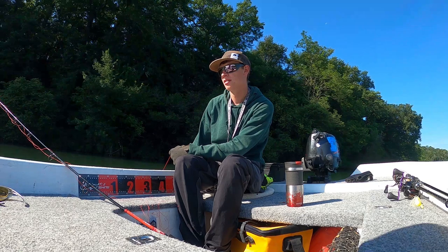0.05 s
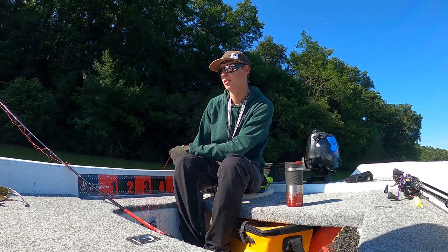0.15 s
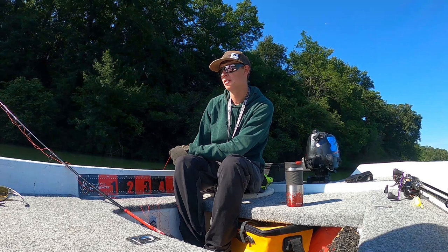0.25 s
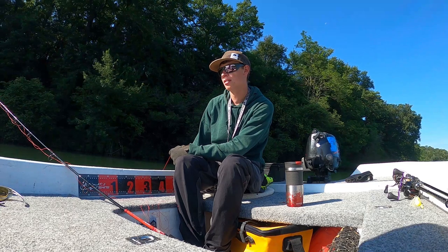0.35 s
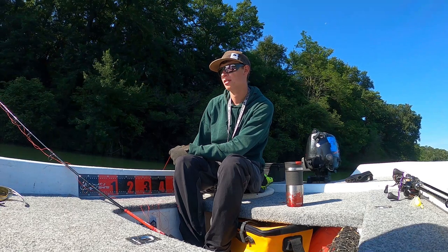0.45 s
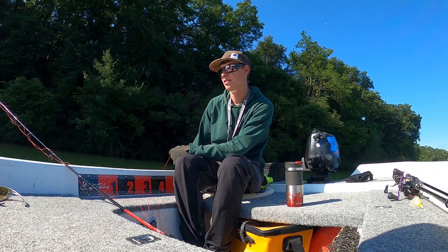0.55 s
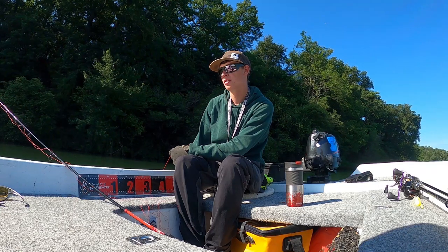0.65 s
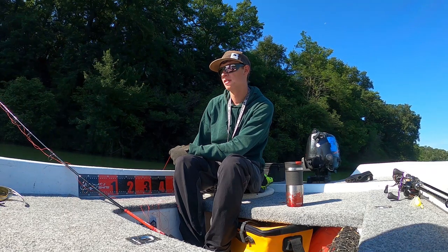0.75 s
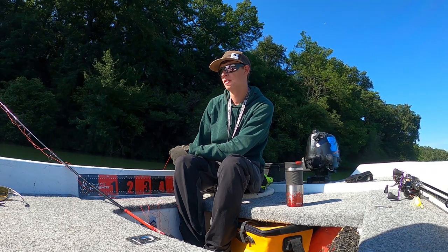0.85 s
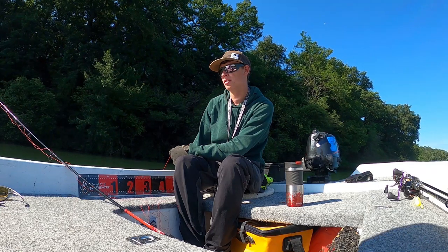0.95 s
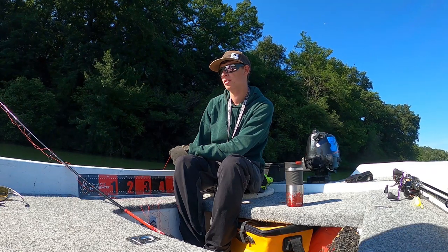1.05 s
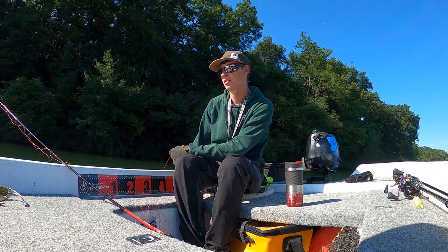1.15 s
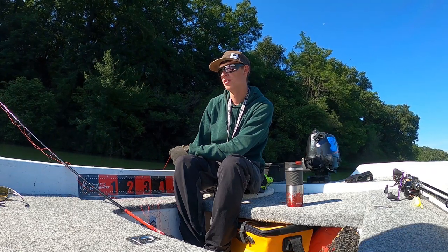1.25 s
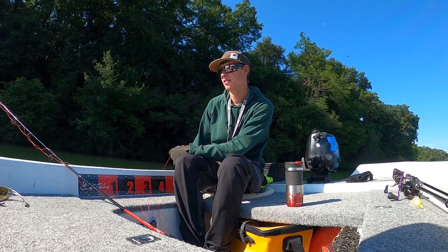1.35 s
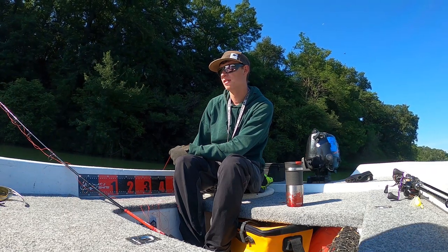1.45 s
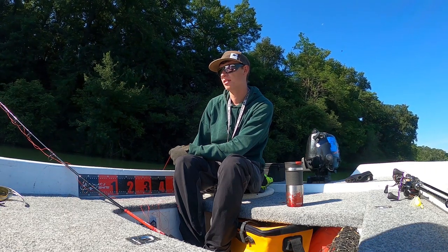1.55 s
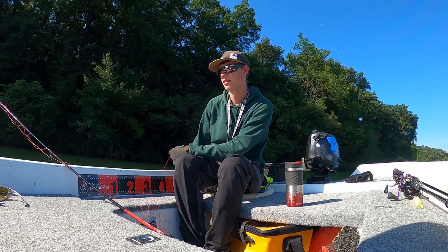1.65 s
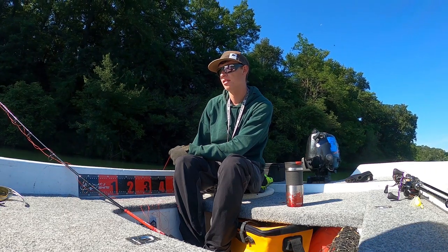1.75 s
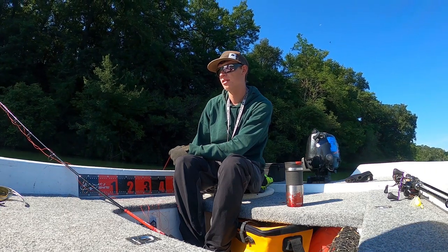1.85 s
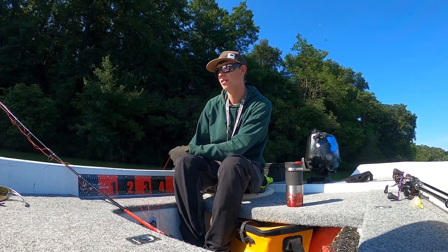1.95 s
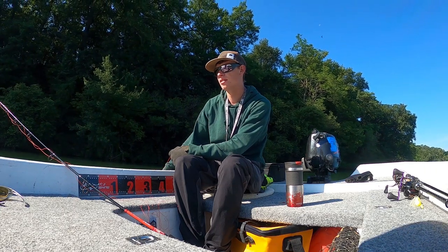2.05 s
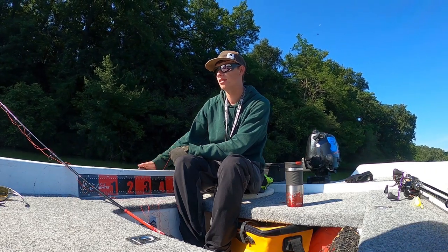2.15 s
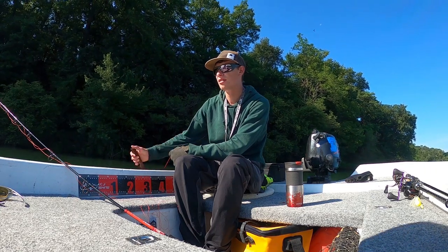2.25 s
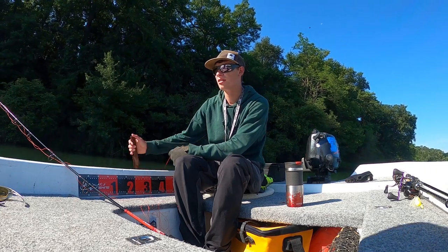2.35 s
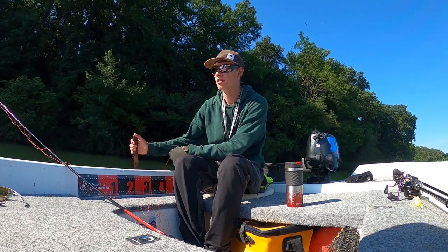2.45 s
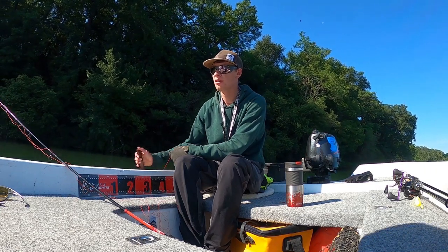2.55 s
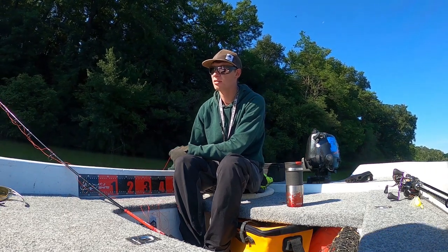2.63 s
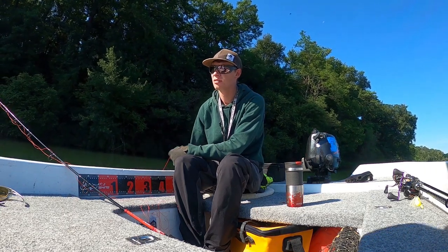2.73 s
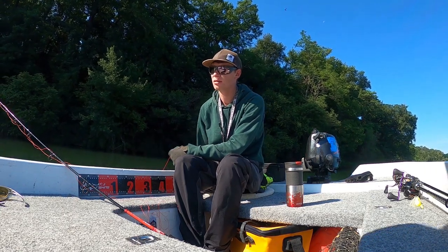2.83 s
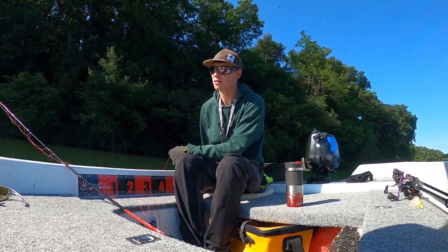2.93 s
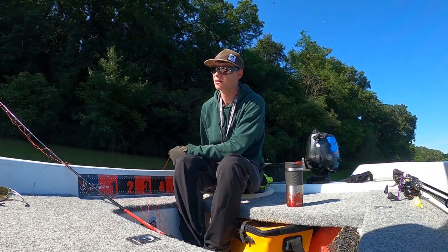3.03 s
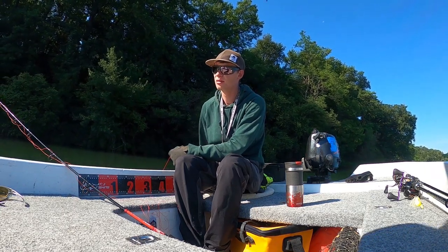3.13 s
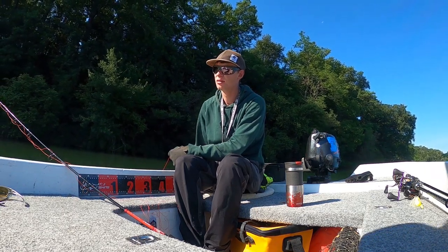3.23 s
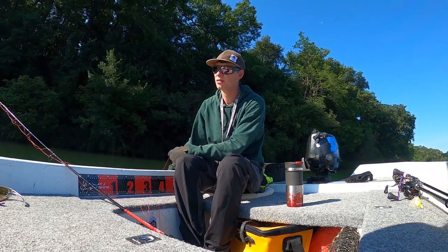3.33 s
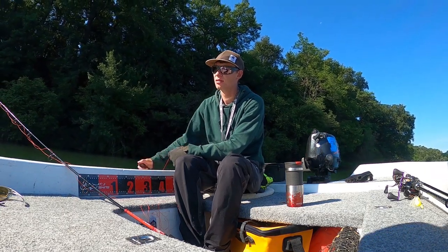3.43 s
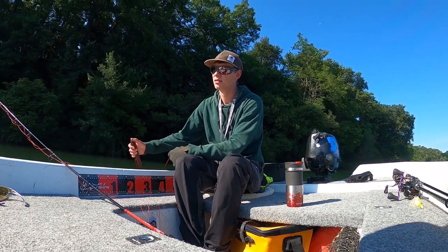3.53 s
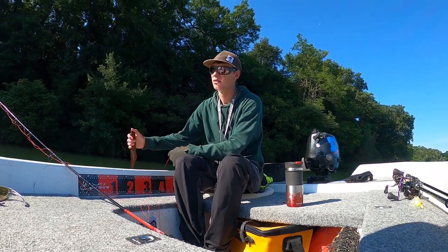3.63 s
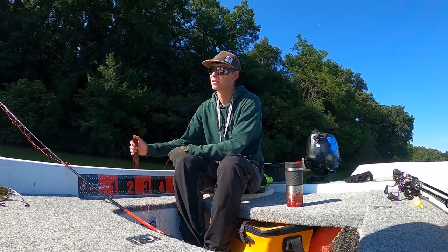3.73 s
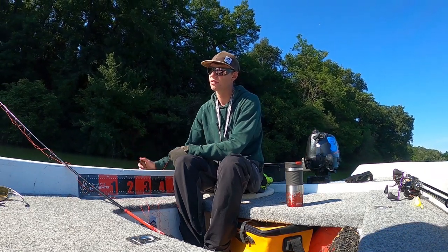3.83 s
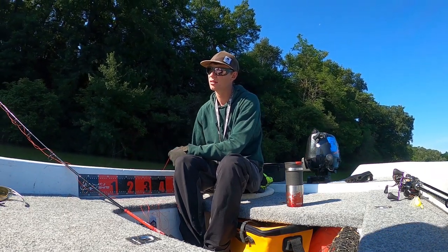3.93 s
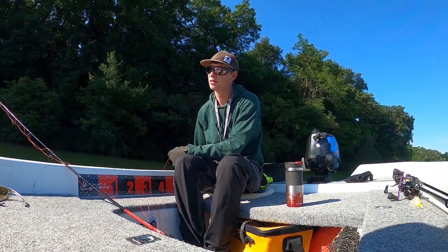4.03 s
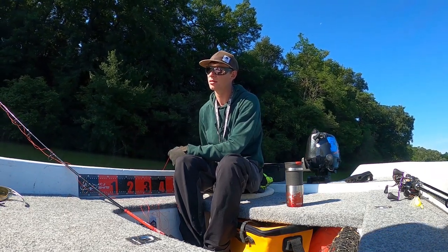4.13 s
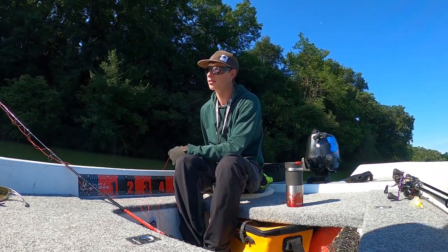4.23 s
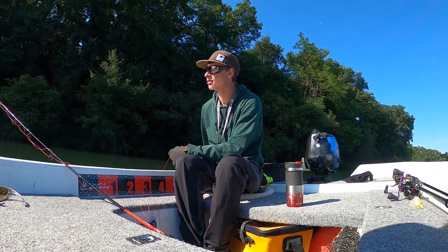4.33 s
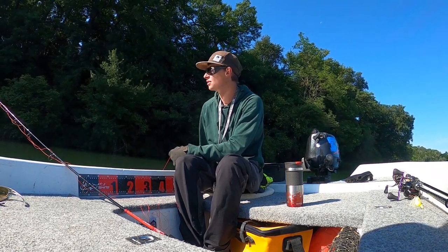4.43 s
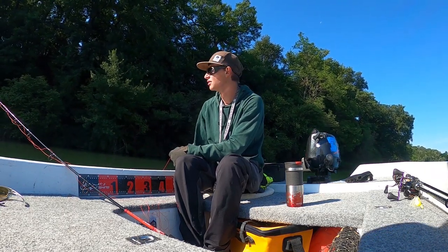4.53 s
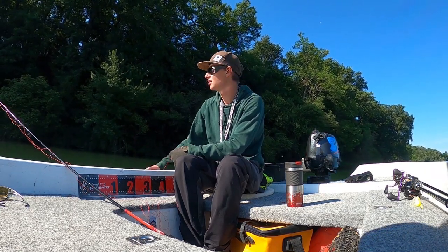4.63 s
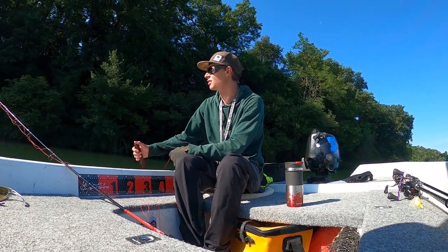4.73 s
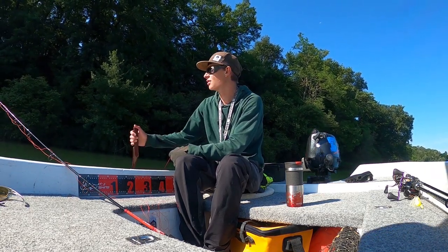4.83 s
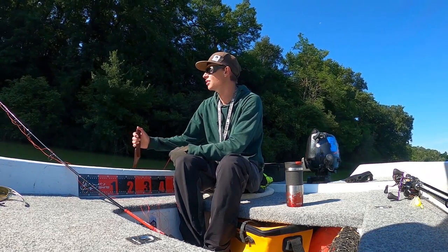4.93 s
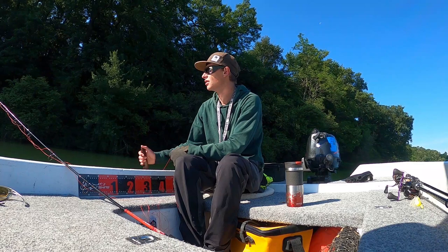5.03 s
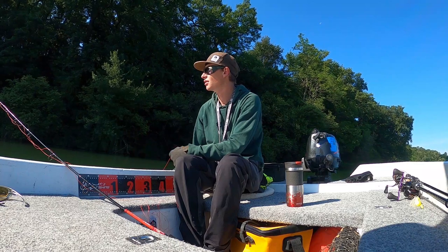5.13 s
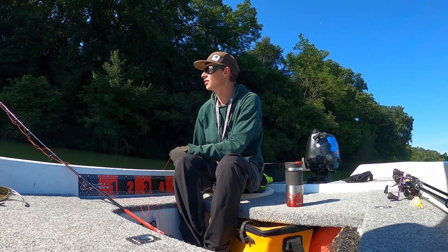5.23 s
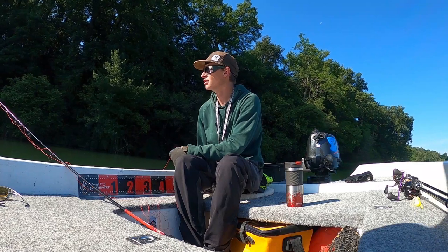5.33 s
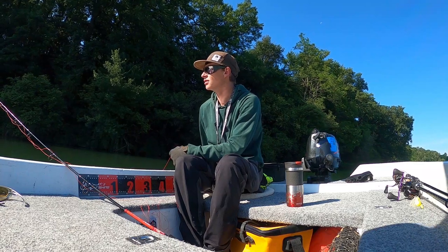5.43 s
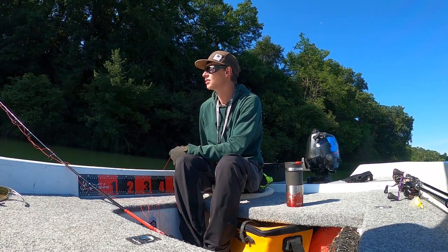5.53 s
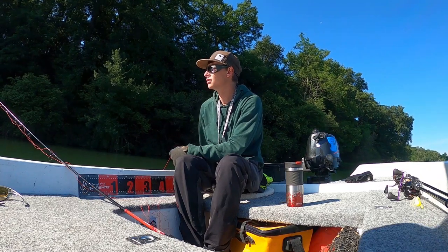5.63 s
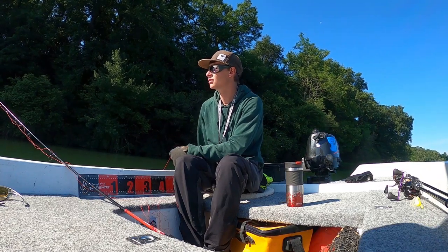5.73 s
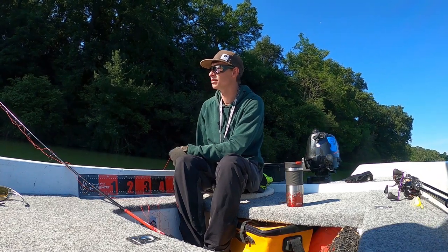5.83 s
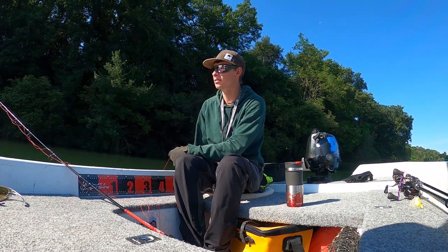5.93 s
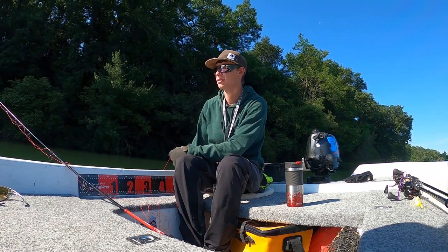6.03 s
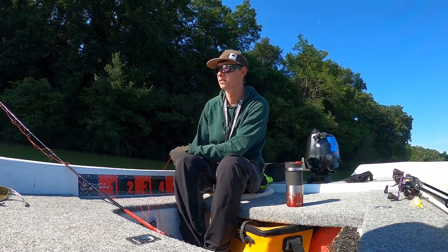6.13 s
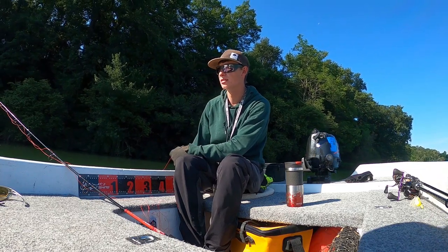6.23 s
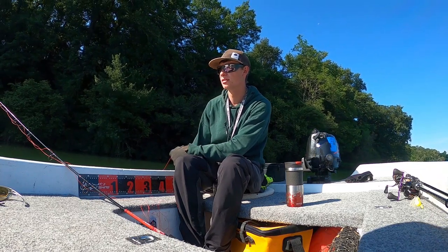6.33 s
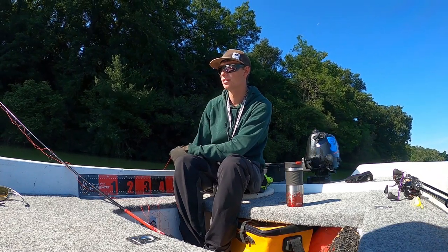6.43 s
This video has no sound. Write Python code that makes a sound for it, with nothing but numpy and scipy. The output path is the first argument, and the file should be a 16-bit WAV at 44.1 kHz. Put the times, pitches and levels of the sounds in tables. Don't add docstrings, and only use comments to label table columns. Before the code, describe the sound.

Three deep hollow plops strike the river beside a small boat, about 1.25 seconds apart, splashing and dripping, with faint birds chirping over quiet water hush.

```python
import sys
import numpy as np
from scipy import signal
from scipy.io import wavfile
from scipy.ndimage import uniform_filter1d, map_coordinates

SR = 44100
rng = np.random.default_rng(int(sys.argv[2]) if len(sys.argv) > 2 else 0)


def volts_from_decibels(level):
    exponent = np.asarray(level, float) / 20
    return 10 ** exponent


def master_out(mix):
    frames = np.transpose(np.atleast_2d(mix))
    ceiling = np.clip(frames, -1, 1)
    pcm = np.round(ceiling * 32767).astype(np.int16)
    wavfile.write(sys.argv[1], SR, pcm)


N = 285762


def rms_one(x):
    return x / np.sqrt(np.mean(x ** 2) + 1e-20)


def at_hz(points, hz):
    curve_hz, value = np.transpose(points)
    return np.interp(np.log(hz), np.log(curve_hz), value)


def add(out, start_s, sound, pan_db=0, lag_s=0):
    for channel, side in enumerate([1, -1]):
        i = round((start_s + side * lag_s / 2) * SR)
        out[channel, i:i + len(sound)] += sound[:N - i] * volts_from_decibels(side * pan_db / 2)


def seconds(length_s):
    return np.arange(int(length_s * SR)) / SR


def sine(pitch_hz):
    return np.sin(2 * np.pi * np.cumsum(pitch_hz) / SR)


def filtered_noise(count, cutoff_hz, kind="low"):
    sos = signal.butter(2, cutoff_hz, kind, fs=SR, output="sos")
    return signal.sosfilt(sos, rng.standard_normal(count))


def drift(rate_hz):
    knots = rng.standard_normal(int(N / SR * rate_hz) + 3)
    return map_coordinates(knots, [np.arange(N) / SR * rate_hz], order=2)


def peak_db(peak_s, level_db, rise, fall):
    t = np.arange(N) / SR - peak_s
    return level_db - np.where(t < 0, -rise * t, fall * t)


def louder(*levels_db):
    return np.maximum.reduce(np.broadcast_arrays(*levels_db))


# pitch_hz, likeness (1 = the same)
EAR_LIKENESS = [(60, 0.92), (160, 0.93), (440, 0.078), (1210, 0.71), (3290, 0.59), (8940, -0.29)]


def banded_noise(spectrum, patchy_db, flicker_hz, near):
    edges = 22 * 2 ** np.arange(0, 9.4, 1 / 3)
    white = rng.standard_normal((2, 2, N))
    for k, (low, high) in enumerate(zip(edges, edges[1:])):
        sos = signal.butter(2, [low, high], "band", fs=SR, output="sos")
        mid, side = signal.sosfilt(sos, white[k % 2])
        hz = np.sqrt(low * high)
        alike = np.clip(near + (1 - near) * at_hz(EAR_LIKENESS, hz), -1, 1)
        gain = volts_from_decibels(at_hz(spectrum, hz) + patchy_db * drift(flicker_hz))
        yield hz, gain * (np.sqrt(1 + alike) * mid + np.sqrt(1 - alike) * side * [[1], [-1]])


def bank_echo(x, t60, gap_s):
    t = np.arange(SR) / SR
    response = rng.standard_normal((2, SR)) * volts_from_decibels(-60 * t / t60) * np.clip(t / gap_s, 0, 1) ** 2
    response = response / np.sqrt(np.sum(response[0] ** 2))
    return signal.fftconvolve(x.mean(axis=0)[None], response, axes=1)[:, :N]


# start_s, rocking level_db, far engine level_db
CALM = [(0.0, -66, -55), (0.5, -63, -51.5), (1.06, -63, -55.5), (1.64, -66, -49.5), (1.99, -52.5, -52),
        (2.38, -62, -53.5), (2.8, -68.5, -51.5), (3.75, -59.5, -57), (4.1, -67, -55), (4.66, -62, -56.5),
        (4.93, -55.5, -57.5), (5.3, -71, -54.5), (5.96, -61.5, -55), (6.48, -67, -55.5)]
# rocking level_db, churning level_db, churning fall (dB per s)
WAKES = [
    (-50.5, -38, 70),
    (-48.5, -35, 106),
    (-44, -35.5, 76),
]


def rocking_and_engine_levels():
    rise, rock_fall = 299, 31
    start_s, *calm = np.transpose(CALM)
    rocking_db, engine_db = (np.interp(np.arange(N) / SR, start_s, db) for db in calm)
    for (shut_s, *_), (rock_db, churn_db, churn_fall) in zip(BUBBLES, WAKES):
        rocking_db = louder(rocking_db, peak_db(shut_s + .09, rock_db, rise, rock_fall))
        engine_db = louder(engine_db, peak_db(shut_s + .068, churn_db, rise, churn_fall))
    return rocking_db, engine_db


# pitch_hz, level (dB per Hz)
AIR_COLOUR = [(15, -50), (25, -12.5), (86, -9), (114, -16), (211, -18), (245, -28.5), (364, -23.5),
              (455, -27), (767, -33.5), (1650, -32.5), (1970, -36.5), (4040, -34.5), (6160, -32.5),
              (7700, -28.5), (9390, -68), (12200, -97), (20700, -120)]
# start_s, change in level_db
LEAF_BREEZE = [(0, 0), (.5, -1), (.7, -5), (1.1, -5), (1.5, 2), (2, 3), (2.9, 1), (3.4, -4), (5.2, -5),
               (5.8, -1), (6.48, -1)]


def air():
    bands = list(banded_noise(AIR_COLOUR, patchy_db=1.3, flicker_hz=12, near=0))
    ranges_hz = [(0, 60), (60, 250), (250, 3200), (3200, SR)]
    rocking, engine, hush, leaves = (
        rms_one(sum(band for hz, band in bands if low < hz < high)) for low, high in ranges_hz)
    rocking_db, engine_db = rocking_and_engine_levels()
    leaves = signal.sosfilt(signal.butter(8, 8500, fs=SR, output="sos"), leaves)
    leaves_db = -76.5 + np.interp(np.arange(N) / SR, *np.transpose(LEAF_BREEZE))
    return volts_from_decibels(rocking_db) * rocking + volts_from_decibels(engine_db) * engine + volts_from_decibels(-70.5) * hush + volts_from_decibels(leaves_db) * leaves


def trills(table, swing_hz, pan_db):
    out = np.zeros((2, N))
    for start_s, length_s, trough_hz, beats, level_db in table:
        t = seconds(length_s)
        up = 1 - np.abs(np.cos(np.pi * beats * t))
        edges = np.clip(t / .004, .1, 1) ** 2 * np.clip((length_s - t) / .012, 0, 1)
        shape = edges * volts_from_decibels(-20 * np.minimum(2 * up, 1))
        base = trough_hz * (1.025 - .06 * t / length_s - .06 * np.exp(-t / .0045))
        pitch = base + swing_hz * (1 - .3 * t / length_s) * up ** .75
        add(out, start_s, volts_from_decibels(level_db) * shape * sine(pitch), pan_db)
    return out


# start_s, first pitch_hz, middle pitch_hz, last pitch_hz, level_db
CHIPS = [(.06, 6230, 6200, 6540, -71), (0.122, 5060, 5770, 5840, -69.5), (.135, 7000, 6900, 6900, -81),
         (0.217, 7700, 7700, 7000, -81), (.29, 3410, 6500, 7100, -67), (0.406, 4650, 6800, 6670, -66),
         (0.419, 4300, 5500, 5970, -69), (1.143, 4600, 5420, 5160, -63), (3.518, 7200, 7800, 7430, -71.5),
         (4.80, 3670, 3650, 3710, -77)]
# start_s, length_s, first pitch_hz, last pitch_hz, level_db
FALLING_SONG = [
    (1.96, .125, 7900, 6500, -59),
    (2.175, .08, 7700, 6050, -58),
    (2.37, .065, 6900, 5900, -63),
]


def whistles():
    notes = [(start_s, .031, *rest) for start_s, *rest in CHIPS]
    for start_s, length_s, first, last, level_db in FALLING_SONG:
        notes.append((start_s, length_s, first, (first + last) / 2, last, level_db))
    for k in range(6):
        notes.append((4.688 + .11 * k, .072, 2150 + 55 * k / 2, 2480 + 55 * k, 2150, -74.5 + .7 * k))
    out = np.zeros((2, N))
    for start_s, length_s, first, middle, last, level_db in notes:
        u = np.linspace(-1, 1, int(length_s * SR))
        pitch = middle + u * (last - first) / 2 + u ** 2 * ((first + last) / 2 - middle)
        add(out, start_s, volts_from_decibels(level_db) * (1 - u ** 2) * sine(pitch), rng.normal(0, 4.5))
    return out


# start_s, first pitch_hz, top pitch_hz, level_db
SWOOP_CALLS = [
    (2.918, 4600, 8690, -51),
    (3.032, 3860, 8550, -55),
]


def swoops():
    out, length_s = np.zeros((2, N)), .05
    t = seconds(length_s)
    for start_s, first, top, level_db in SWOOP_CALLS:
        pitch = top - (top - first) * np.exp(-t / .007) - 22000 * t
        add(out, start_s, volts_from_decibels(level_db) * np.sin(np.pi * t / length_s) * sine(pitch), -2.5)
    return out


# first start_s, gap_s, number of notes, pitch_hz, level_db
BUZZY_PHRASES = [
    (1.215, .0465, 5, 3680, -75),
    (1.555, .083, 5, 5420, -72),
    (1.995, .1, 1, 5500, -76),
]


def buzzes():
    out, t = np.zeros((2, N)), seconds(.036)
    split = .07 * np.sin(np.pi * t / t[-1])
    for start_s, gap_s, count, hz, level_db in BUZZY_PHRASES:
        for k in range(count):
            voices = sine(hz * (1 + split)) + sine(hz * (1 - split)) + .6 * sine(np.full(len(t), hz / 2))
            wobble = uniform_filter1d(rng.standard_normal(len(t)), size=24)
            rasp = 1 + 3.5 * uniform_filter1d(wobble, size=24)
            sound = volts_from_decibels(level_db) * np.hanning(len(t)) ** .4 * rasp * voices
            add(out, start_s + gap_s * k - .018, sound, 3)
    return out


# start_s, length_s, trough pitch_hz, beats per s, level_db
NEAR_TRILLS = [(3.577, .082, 7450, 41.5, -59), (3.781, .112, 7950, 57, -46), (4.195, .03, 7400, 45, -63),
               (4.241, .078, 7700, 43, -52), (4.655, .084, 7400, 41, -50), (4.785, .066, 7800, 50, -54)]
DISTANT_TRILLS = [(4.983, 0.063, 7670, 71.5, -53), (5.135, 0.1, 7310, 62.3, -51),
                  (5.335, 0.048, 7340, 52.7, -46)]
WEAK_TRILLS = [(.68, 0.053, 7770, 60, -64.5), (1.29, 0.07, 7300, 53, -67), (4.72, 0.15, 6480, 53, -77),
               (4.93, 0.087, 7670, 210.6, -63.5), (6.17, 0.12, 7100, 53, -63)]


def birds():
    near = trills(NEAR_TRILLS, 1400, -14.5) + whistles() + swoops() + buzzes()
    far = trills(DISTANT_TRILLS, 1620, -7.5) + trills(WEAK_TRILLS, 698, -10)
    near_echo = volts_from_decibels(-4) * bank_echo(near, t60=.5, gap_s=.006)
    far_echo = bank_echo(far, t60=.45, gap_s=.004)
    flutter = volts_from_decibels(1.5 * drift(150))
    return flutter * (near + volts_from_decibels(-7) * far) + (near_echo + far_echo) * volts_from_decibels(np.array([[-2], [2]]))


# start_s, peak level_db, left-right balance (dB)
GEAR_TICKS = [(0.3027, -70, -2.5), (0.405, -63, -2.0), (0.9428, -65, 9), (1.1313, -74, 1), (1.446, -59, 7),
              (3.4407, -60, -4), (3.717, -79, 5.5), (3.924, -59.5, 2), (3.9644, -65, 7.5), (3.9898, -63, 5),
              (4.8601, -74, 10), (5.289, -60, 6), (5.919, -49.5, -0.5), (6.101, -62, 10), (6.1394, -65, 21)]


def ticks():
    out, t = np.zeros((2, N)), seconds(.02)
    for start_s, level_db, pan_db in GEAR_TICKS:
        noise = filtered_noise(len(t), [3000, 6500], "band")
        add(out, start_s, volts_from_decibels(level_db + 3) * noise * np.exp(-t / .004), pan_db)
    return out


# start_s, peak level_db, left-right balance (dB), thud level_db
BOAT_TAPS = [(1.734, -58, 9, 5), (1.767, -59, 9, 5), (1.848, -46, 9, -8), (2.010, -57, 8, 6),
             (2.655, -39, 6, -30), (2.706, -49, 8, -24), (2.749, -52, 10, -16), (2.775, -55, 5, -8),
             (4.677, -62, 8, -12)]
# pitch_hz, level_db
WOOD_RING = [(1130, 2), (1704, 8), (2390, 4), (2900, -6)]


def taps():
    out, t = np.zeros((2, N)), seconds(.1)
    for start_s, level_db, pan_db, thud_db in BOAT_TAPS:
        ring = 0
        for hz, ring_db in WOOD_RING:
            fade = volts_from_decibels(ring_db - 3.5 + rng.normal(0, 1.7) - 60 * t / .012)
            ring = ring + fade * np.sin(2 * np.pi * hz * rng.normal(1, .036) * t)
        click = volts_from_decibels(-6) * filtered_noise(len(t), [900, 3500], "band") * np.exp(-t / .003)
        thud = volts_from_decibels(thud_db + 12) * filtered_noise(len(t), [150, 1100], "band") * np.exp(-t / .011)
        add(out, start_s, volts_from_decibels(level_db) * (1 - np.exp(-t / .0006)) * (ring + click + thud), pan_db)
    return out


def droplet(hz, cycles, rise):
    turns = np.arange(int(cycles * SR / hz)) * hz / SR
    return np.minimum(turns, 1) * volts_from_decibels(-60 * turns / cycles) * sine(hz * (1 + rise * turns / cycles))


# start_s, peak level_db, pitch_hz, left-right balance (dB)
BIG_DROPS = [(2.883, -30.5, 908, -2), (2.927, -35, 964, 6), (2.992, -38, 548, 5), (3.098, -44.5, 500, 6),
             (3.163, -43.5, 1140, 7), (3.529, -51.5, 1590, 1), (3.753, -58, 1620, 16),
             (4.119, -31.5, 797, 2.5), (4.131, -36.5, 1446, 1), (4.229, -38, 915, 5), (4.284, -42, 875, 5),
             (4.339, -45, 999, 3), (4.393, -37, 646, 6), (4.48, -47, 1480, 1.0), (4.496, -47, 1100, -7),
             (4.571, -47.5, 1060, 5), (4.739, -55, 1676, 1.0), (4.858, -48.5, 1560, 0.0),
             (5.366, -28.5, 903, 1), (5.427, -43.5, 610, -6.5), (5.48, -37.5, 980, 5.5),
             (5.58, -40.5, 1020, 3), (5.62, -43, 1640, -5), (5.659, -47, 1260, 1.0),
             (5.721, -44.5, 1670, -6), (5.811, -44, 2340, 9), (5.848, -46, 3300, 4),
             (5.904, -52.5, 1575, -1), (5.934, -63.5, 1020, 1)]


def drops():
    out, t = np.zeros((2, N)), seconds(.01)
    for start_s, level_db, hz, pan_db in BIG_DROPS:
        add(out, start_s, volts_from_decibels(level_db) * droplet(.9 * hz, 21, .64), pan_db)
        tick = filtered_noise(len(t), 4000)
        add(out, start_s, volts_from_decibels(level_db - 10) * tick * np.exp(-t / .002), pan_db)
    return out


# first touch start_s, tearing level_db, patter level_db
TORN_WATER = [
    (2.847, -35.5, -57),
    (4.114, -36.5, -57),
    (5.359, -35.5, -57),
]
PATTER_END = [
    3.34,
    4.53,
    5.76,
]
# start_s, level_db below 3 kHz, level_db above
SPRAY_HANDFULS = [(2.884, -34.5, -60), (2.928, -48, -61.5), (3.035, -66, -61), (3.165, -63, -76),
                  (3.276, -63, -64.5), (4.394, -46.5, -67.5), (4.5, -63, -69.5), (4.136, -31.5, -49),
                  (5.385, -34, -52), (5.61, -55.5, -74), (5.725, -57, -70.5), (5.785, -64, -63),
                  (5.851, -69, -67)]


def spray_levels():
    t = np.arange(N) / SR
    dribble = np.interp(t, [2.58, 2.63, CAVITIES[0][0]], [-30, -3, 0], -60, -60)
    dull_db, bright_db = -67 + dribble, -70 + dribble
    clumps_db = 1.95 * drift(22)
    for (touch_s, tear_db, patter_db), end_s, (entry_s, *_) in zip(TORN_WATER, PATTER_END, CAVITIES):
        tear = tear_db + np.interp(t, [touch_s - .002, touch_s, entry_s], [-90, -15, 0])
        since = np.clip(t - entry_s, 0, None)
        lull = np.where(since < .2, -1.5, 0)
        patter = patter_db + clumps_db + lull - 14.5 * since
        patter = patter - 230 * np.clip(t - end_s, 0, None) - 99 * (t < entry_s)
        dull_db = louder(dull_db, tear - 188.5 * since, patter)
        bright_db = louder(bright_db, tear - 13.5 - 328.5 * since, patter - 16)
    for start_s, low_db, high_db in SPRAY_HANDFULS:
        shape = peak_db(start_s, 0, rise=2500, fall=401)
        dull_db, bright_db = louder(dull_db, low_db + shape), louder(bright_db, high_db + shape)
    return dull_db, bright_db + 8


# pitch_hz, level (dB per Hz)
SPRAY_TONE = [(290, -45.5), (500, -4), (671, -28), (778, -11), (1110, -5), (1380, -9.5), (2260, -8.5),
              (5470, -14.5), (7350, -16), (9390, -27.5), (12200, -78), (20700, -120)]


def spray():
    dull_db, bright_db = spray_levels()
    hiss = 0
    for hz, band in banded_noise(SPRAY_TONE, patchy_db=3, flicker_hz=52, near=.61):
        share = np.clip(np.log2(hz / 1800) / 1.3, 0, 1)
        hiss = hiss + band * volts_from_decibels((1 - share) * dull_db + share * bright_db)
    crowd = np.zeros((2, N))
    for when, pitch, size, side in rng.random((1500, 4)):
        bubble = droplet(680 * 5 ** pitch, 24, .4) * volts_from_decibels(15 * size ** 2)
        add(crowd, when * N / SR, bubble, 2 + 6 * (side - .5))
    balance = volts_from_decibels(np.array([[1.2], [-1.2]]))
    crackle = volts_from_decibels(2.4 * drift(250))
    crowd_db = np.minimum(dull_db, -50) - 2.5
    return balance * crackle * volts_from_decibels(13) * hiss + volts_from_decibels(crowd_db) * rms_one(crowd)


# entry start_s, first pitch_hz, climb (Hz per s), level_db, growth_s
CAVITIES = [
    (2.8503, 60.5, 768, -10.5, .0125),
    (4.1317, 69.6, 843, -12.0, .0052),
    (5.3655, 73.6, 359, -12.7, .0081),
]
# start_s, first pitch_hz, last pitch_hz, climb_s, level_db
BUBBLES = [
    (2.8894, 168, 302.6, .0134, -.5),
    (4.1585, 121, 333.5, .0137, 15.1),
    (5.4030, 152, 319.2, .0078, 3.1),
]
# slap level_db, bubble growth_s, bubble decay_s
STROKE_MANNER = [
    (-14, .0017, .0185),
    (-27.5, .03, .0086),
    (-29.5, .0034, .0089),
]
# pitch_hz, level_db, time to fall 60 dB (s)
HULL_BOOM = [
    (39.3, -31, 0.43),
    (68, -23.5, 0.4),
    (92.65, -25, 0.25),
]


def plops():
    out, t = np.zeros((2, N)), seconds(.5)
    for cavity, bubble, (slap_db, swell_s, decay_s) in zip(CAVITIES, BUBBLES, STROKE_MANNER):
        entry_s, hum_hz, climb, hum_db, growth_s = cavity
        shut_s, low_hz, high_hz, glide_s, bubble_db = bubble
        closed = np.clip(t - (shut_s - entry_s), 0, None)
        hum_shape = (1 - np.exp(-t / growth_s)) * np.exp(-closed / .011)
        add(out, entry_s, -volts_from_decibels(hum_db) * hum_shape * sine(hum_hz + climb * t), -.7, .0005)
        slap = np.exp(-(t / .0057) ** 2) * sine(np.full(len(t), 240))
        add(out, entry_s, -volts_from_decibels(slap_db) * slap, 1.5)
        burst = np.clip((.06 - t) / .008, 0, 1)
        bubble_shape = (1 - np.exp(-t / swell_s)) * np.exp(-t / decay_s) * burst
        pitch = high_hz - (high_hz - low_hz) * np.exp(-t / glide_s)
        add(out, shut_s, -volts_from_decibels(bubble_db) * bubble_shape * sine(pitch), 1.6)
        for hz, level_db, t60 in HULL_BOOM:
            boom = np.sin(2 * np.pi * (hz * rng.normal(1, .013) * t + rng.random()))
            boom_shape = volts_from_decibels(.8 + level_db - 60 * t / t60) * (1 - np.exp(-t / .014))
            add(out, shut_s, boom_shape * boom, -1, .0008)
    return out


def scene():
    background = air()
    bird_song = birds()
    left, right = background + ticks() + volts_from_decibels(3.5) * taps() + drops() + spray()
    around_boat = [np.roll(left, 2), right]
    strokes = plops()
    thin = signal.sosfilt(signal.butter(2, 130, "high", fs=SR, output="sos"), strokes)
    echo = volts_from_decibels(-26) * bank_echo(thin, t60=.79, gap_s=.17)
    return strokes + echo + around_boat + bird_song


def band_limit(x):
    return signal.sosfilt(signal.butter(12, 14200, fs=SR, output="sos"), x)


def record(dry):
    dull = signal.sosfilt(signal.butter(2, 12500, fs=SR, output="sos"), dry)
    return band_limit(dull)


dry = scene()
out = record(dry)
master_out(out)
```